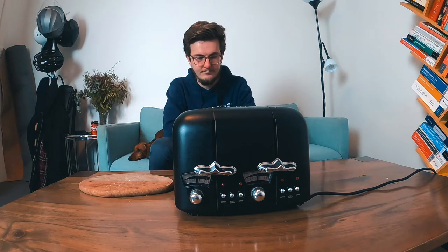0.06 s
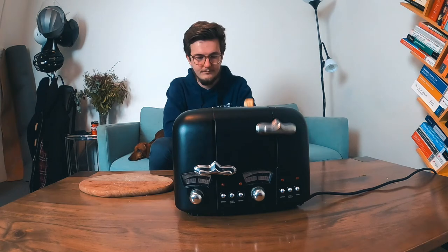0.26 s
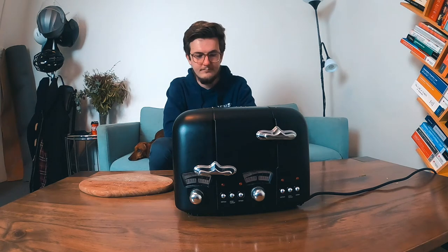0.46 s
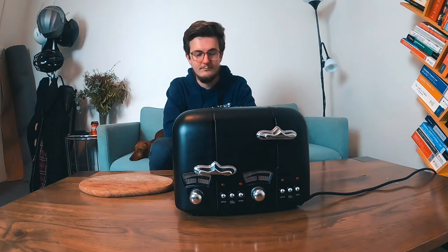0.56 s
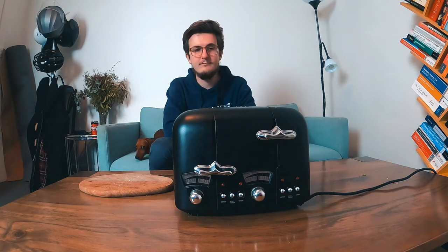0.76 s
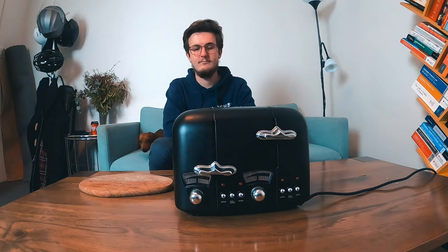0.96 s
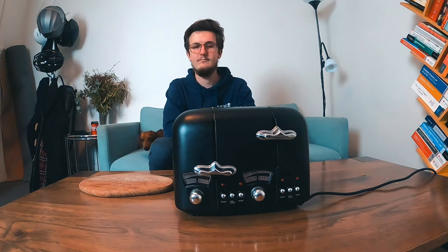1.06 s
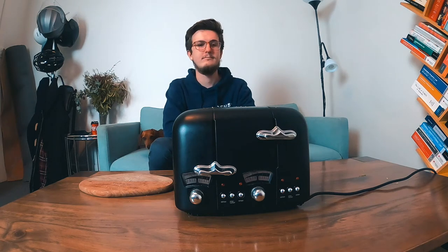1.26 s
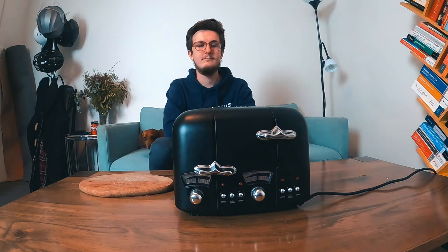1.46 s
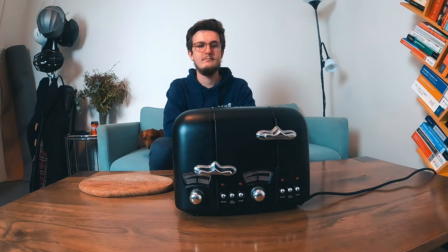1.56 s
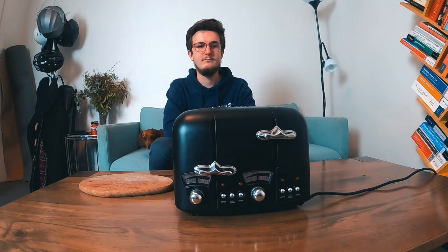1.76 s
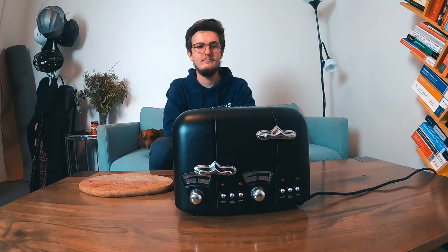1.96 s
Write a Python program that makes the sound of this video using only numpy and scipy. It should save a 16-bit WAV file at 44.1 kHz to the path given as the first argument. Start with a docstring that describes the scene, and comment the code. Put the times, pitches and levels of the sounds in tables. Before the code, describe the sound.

A toaster pops up on a wooden table: the latch snaps, the carriage crashes into its stop and the metal rack rattles, then a faint low buzz fades. The microphone is close, in a quiet room.

```python
"""A snap, a rattling crash and a faint low buzz: a toaster pops up on a wooden table in a quiet room.
The latch lets go and the carriage slams into its stop; the wire rack bounces and rings, loose parts
clatter in the casing and the feet thump the table. The sprung carriage then shudders to rest.
The microphone is close and overloads."""
import sys
import numpy as np
from scipy import signal
from scipy.fft import rfft, irfft
from scipy.io import wavfile
from scipy.ndimage import uniform_filter1d

SR = 44100
rng = np.random.default_rng(int(sys.argv[2]) if len(sys.argv) > 2 else 0)


def dump(signal):
    """Clip the signal to [-1, 1] and save it as 16-bit WAV at the path in sys.argv[1]."""
    limited = np.clip(np.atleast_2d(signal).T, -1, 1)
    pcm = np.round(limited * 32767).astype(np.int16)
    wavfile.write(sys.argv[1], SR, pcm)


N = 88200
T = np.arange(N) / SR

# direct sound, left-right likeness: f/Hz, correlation (clipped to +-1 in use)
DIRECT_CORRELATION = [(100, 1), (700, 0.97), (1500, .85), (3500, 1), (6000, -2.3), (9000, -.5)]


def from_db(db):
    """Decibels to gain."""
    return 10 ** (np.asarray(db) / 20)


def unit_rms(x):
    """Scale to rms 1."""
    return x / np.sqrt(np.mean(x ** 2) + 1e-20)


def at_hz(points, hz):
    """Interpolate a table over log frequency."""
    freqs, values = np.transpose(points)
    return np.interp(np.log(hz), np.log(freqs), values)


def noise(spectrum, correlation):
    """Stereo noise of given spectral shape and left-right correlation; rms 1."""
    hz = np.fft.rfftfreq(N, 1 / SR) + 1
    alike = np.clip(at_hz(correlation, hz), -1, 1)
    mid, side = rfft(rng.standard_normal((2, N))) * from_db(at_hz(spectrum, hz)) * (hz > 20)
    return unit_rms(irfft(np.sqrt(1 + alike) * mid + np.sqrt(1 - alike) * side * [[1], [-1]], N))


def convolve(x, response):
    """Pass a signal through a stereo response scaled to unit energy."""
    return signal.fftconvolve(np.atleast_2d(x), unit_rms(response) / np.sqrt(N), axes=1)[:, :N]


def impulses(hits, scatter_db=0, random_sign=False):
    """One impulse per (t/s, level/dB) row."""
    times_s, db = np.transpose(hits)
    scatter, polarity = rng.standard_normal((len(times_s), 2)).T
    sign = np.sign(polarity) if random_sign else 1
    out = np.zeros(N)
    out[np.clip((times_s * SR).astype(int), 0, N - 1)] = sign * from_db(db + scatter_db * scatter)
    return out


def ring(force, modes):
    """Sum of damped resonators, one per (f/Hz, level/dB, T60/s) row."""
    out = np.zeros(N)
    for hz, db, t60_s in modes:
        r, w = from_db(-60 / (t60_s * SR)), 2 * np.pi * hz / SR
        out += from_db(db) * signal.lfilter([0, np.sin(w)], [1, -2 * r * np.cos(w), r * r], force + 1e-18)
    return out


def contacts(hits, spectrum, t60_s):
    """Each contact lands on a new spot and sets off its own decaying noise burst."""
    energy_decay = from_db(-60 / (t60_s * SR)) ** 2
    energy = signal.lfilter([1], [1, -energy_decay], impulses(hits) ** 2 + 1e-18)
    return np.sqrt(energy) * noise(spectrum, DIRECT_CORRELATION)


def hush():
    """Steady room tone, mostly low."""
    spectrum = [(25, -8.5), (55, -4), (90, -5.5), (160, -2), (240, -5), (400, -7), (600, -13), (900, -15),
                (1300, -13.5), (2600, -21), (7400, -26), (9000, -35.5), (15400, -44.5)]  # f/Hz, density/dB
    correlation = [(60, 1), (180, 0), (550, 0.00012), (1650, 0), (5000, 0.18)]  # f/Hz, left-right correlation
    level_db, pan_db = -55.5, np.array([[-0.2], [0.2]])
    return from_db(level_db + pan_db) * noise(spectrum, correlation)


def latch():
    """The catch snaps open in four quick contacts."""
    snaps = [(.2133, -11.5), (.2158, 0), (.2183, -10.5), (.2203, -3)]  # t/s, level/dB
    spectrum = [(180, -62), (300, -25.5), (1440, -28), (1970, -4.5), (2240, -6.5), (3390, -3.5),
                (4200, -8.5), (5740, -7.5), (7730, -30), (15400, -45.5)]  # f/Hz, density/dB
    return from_db(-5.5) * contacts(snaps, spectrum, t60_s=0.035)


def lever():
    """The lever jolts the shell with dull knocks."""
    jolts = [(.2185, -25.5), (.2305, -19), (.238, -18), (.458, -22.5), (.553, -20)]  # t/s, level/dB
    spectrum = [(100, -6.5), (170, -7), (400, 4), (560, -14.5), (780, -2), (1150, 4), (1600, -17.5),
                (4000, -33)]  # f/Hz, density/dB
    return contacts(jolts, spectrum, t60_s=0.11)


def rack():
    """The wire rack knocks against its guides; each knock clinks and rings the wires."""
    knocks = [(.231, -9), (.2385, -12), (.248, -9), (.2575, -7), (.263, 1), (.2665, 0), (.2705, -5),
              (.275, -4), (.283, -3), (.295, 1), (.2995, -1), (.305, -3), (.312, 0), (.417, -10),
              (.4203, 2), (.4255, 3), (.440, -11), (.448, 1), (.4525, -2), (.461, -8), (.4795, 2),
              (.497, -13), (.5271, -8), (.535, -13), (.5525, -3), (.5585, -4), (.5625, -8), (.570, -4),
              (.600, -19), (.623, -19)]  # t/s, level/dB
    wire_modes = [(3226, -3.5, .04), (3251, 4, 0.085), (3311, -6, .04), (3500, -9, .04), (3490, -7, 0.056),
                  (3596, -7.5, 0.015), (3626, -6.5, .05), (3729, -5.5, .075), (3838, -7.5, 0.06),
                  (3895, -7, 0.049), (4002, -4, .06), (4118, -6.5, 0.038), (4147, -5, .06),
                  (4350, -3.5, 0.078)]  # f/Hz, level/dB, T60/s
    clink_spectrum = [(500, -32.5), (2500, -27), (2900, -20.5), (3250, 7), (4200, 4), (4800, -13),
                      (8000, -22), (15000, -43.5)]  # f/Hz, density/dB
    wires = np.zeros((2, N))
    for hz, db, t60_s in wire_modes:
        force = impulses(knocks, scatter_db=1.0, random_sign=True)
        wire = ring(force, [(hz, db, t60_s)])
        lag_s = rng.normal(0, 0.6) / (2 * np.pi * hz)  # own left-right phase per mode
        wires += [np.interp(T - lag_s, T, wire), np.interp(T + lag_s, T, wire)]
    return from_db(-9) * wires + from_db(-3.5) * contacts(knocks, clink_spectrum, t60_s=0.036)


def casing(taps_per_s=1500, spread_db=3.5, spots=4, shell_t60_s=0.028):
    """Loose parts tap the sheet-metal shell at several spots and ring its panels."""
    rattle = [(.214, -72), (.232, -20.5), (.265, -16), (.285, -16.5), (.3, -10.5), (.32, -5), (.355, -7),
              (.405, -16.5), (.44, -16.5), (.485, -23), (.54, -26), (.556, -22), (.585, -24), (.625, -28.5),
              (.64, -26), (.68, -28), (.712, -30), (.75, -36), (.79, -43.5), (.86, -56)]  # force envelope: t/s, level/dB
    shell_spectrum = [(100, 1.5), (250, -0.5), (400, 3.5), (560, -13.5), (750, -5), (1000, -0.5),
                      (1300, -1), (1700, -2.5), (2400, -5), (3800, 8), (5500, -0.5), (8000, -10),
                      (11000, -20.5), (15000, -30)]  # dense, short-lived modes: f/Hz, density/dB
    panel_modes = [(232, -2, 0.17), (293.3, -4.5, 0.18), (381.4, -6.5, 0.49), (475.3, -10, .2),
                   (712, -4.5, .3), (723, -4.5, .22), (940.6, -5.5, .18), (1039, -7, .18),
                   (1134, -9.5, .22), (1336, -9, 0.33), (1696, 0.5, .1), (2213, -2, 0.15),
                   (2503, 0.5, 0.09), (5302, -4, .13)]  # f/Hz, level/dB, T60/s
    taps = (rng.random(N) < taps_per_s / SR) * rng.choice([-1, 1], N)
    taps = taps * from_db(spread_db * rng.uniform(-1, 1, N))
    force = unit_rms(taps) * from_db(np.interp(T, *np.transpose(rattle), left=-120, right=-120))
    struck_spot = rng.integers(0, spots, N)
    shell = np.zeros((2, N))
    for spot in range(spots):
        response = noise(shell_spectrum, DIRECT_CORRELATION) * from_db(-60 * T / shell_t60_s)
        shell += convolve(force * (struck_spot == spot), response)
    return from_db(4) * shell + from_db(-37.5) * ring(force, panel_modes)


def table(cutoff_hz=250):
    """Soft blows from the feet ring the table top."""
    thumps = [(.232, -17), (.30, -7), (.322, -32), (.334, 1), (.358, -0.5), (.41, -5.5), (.434, -33),
              (.462, -2), (.495, -11.5), (.555, -10.5), (.58, -5), (.603, -14.5), (.635, -9), (.67, -20.5),
              (.708, -15.5), (.795, -24)]  # t/s, level/dB
    top_modes = [(46.3, -1, 0.8), (56, 2.5, 0.32), (68, -4.5, .18), (94, 6, 0.11), (122, -4.5, .16),
                 (156, -22, .14), (169, -4.5, .12)]  # f/Hz, level/dB, T60/s
    soften = signal.butter(2, cutoff_hz, fs=SR, output="sos")
    force = signal.sosfilt(soften, impulses(thumps) + 1e-18)
    return from_db(-18) * ring(force, top_modes)


def slam():
    """The carriage crashes into its stop."""
    impacts = [(.3165, 5.5), (.3205, 3.5), (.333, -1), (.347, -4.5), (.358, -6), (.377, -3.5)]  # t/s, level/dB
    spectrum = [(100, -5), (250, -1), (600, -8), (1000, -4.5), (1400, -7), (1700, 4.5), (2000, 2),
                (2300, 6.5), (3000, -8), (6000, -12), (9000, -16.5), (15000, -27.5)]  # f/Hz, density/dB
    return from_db(-3.5) * contacts(impacts, spectrum, t60_s=0.035)


def twangs(rise_s=0.004):
    """Single panels swell briefly on one note each and die away."""
    notes = [(.497, 733.5, -13, 0.21), (.648, 1138, -19.5, 0.18)]  # t/s, f/Hz, level/dB, T60/s
    out = np.zeros(N)
    for start_s, hz, db, t60_s in notes:
        age_s = np.maximum(T - start_s, 0)
        rise = 1 - np.exp(-(age_s / rise_s) ** 2)
        out += rise * from_db(db - 60 * age_s / t60_s) * np.sin(2 * np.pi * hz * age_s)
    return out


def shudder(swing_hz=63.6, wander=0.017, hum_start_s=0.65, rise_s=0.045, fade_db_per_s=15, scatter_db=4):
    """The carriage's dying swing on its spring hums and taps the casing once a cycle."""
    partials = [(1, 0), (2, -2), (3, -21), (4, -22)]  # hum: harmonic number, level/dB
    buzz_envelope = [(.6, -50), (.72, -40), (.86, -47.5), (.93, -55.5), (1.05, -54.5), (1.14, -52),
                     (1.245, -56.5), (1.275, -62), (1.55, -63), (2.0, -68)]  # t/s, level/dB
    buzz_modes = [(365.4, -1.5, 0.18), (376, -5.5, 0.083), (486, -12.5, 0.063), (670, -10, 0.033),
                  (1090, -11, 0.11), (1190, -13, 0.09), (1340, -8.5, .02), (2000, -19, .01)]  # tapped casing: f/Hz, level/dB, T60/s
    drift = unit_rms(uniform_filter1d(rng.standard_normal(N), size=3000))
    cycles = np.cumsum(swing_hz * (1 + wander * drift)) / SR
    age_s = T - hum_start_s
    hum_gain = np.clip(age_s / rise_s, 0, 1) * from_db(-45 - fade_db_per_s * age_s)
    hum = sum(from_db(db) * np.sin(2 * np.pi * harmonic * cycles) for harmonic, db in partials)
    taps = np.diff(np.floor(cycles), prepend=0) * from_db(scatter_db * rng.standard_normal(N))
    buzz_gain = from_db(np.interp(T, *np.transpose(buzz_envelope), left=-120))
    return hum_gain * unit_rms(hum) + buzz_gain * unit_rms(ring(taps, buzz_modes))


def settling():
    """The parts tick faintly into place."""
    ticks = [(.875, -43.5), (.884, -49)]  # t/s, level/dB
    spectrum = [(500, -11), (2000, -14), (4200, -1.5), (6500, -15), (9500, -14), (12000, -42)]  # f/Hz, density/dB
    return contacts(ticks, spectrum, t60_s=0.3)


def reverb(x, predelay_s=0.0067):
    """Diffuse room tail, longest in the midrange."""
    spectrum = [(50, -4.5), (500, 3), (2000, -2.5), (4000, -15), (8000, 16.5), (15000, -2.5)]  # f/Hz, density/dB
    correlation = [(100, 0.78), (700, .92), (1500, 0.27), (3500, .2), (6000, 0.24), (10000, -.2)]  # f/Hz, left-right correlation
    decay_times = [(100, 0.17), (500, 0.61), (1500, 0.79), (4000, 0.63), (12000, .36)]  # f/Hz, T60/s
    wash = noise(spectrum, correlation)
    edges_hz = np.geomspace(30, 18000, 9)
    tail = np.zeros((2, N))
    for low, high in zip(edges_hz, edges_hz[1:]):
        band = signal.sosfilt(signal.butter(2, [low, high], "band", fs=SR, output="sos"), wash)
        tail += band * from_db(-60 * T / at_hz(decay_times, np.sqrt(low * high)))
    return convolve(x.mean(axis=0), tail * (T > predelay_s))


def limiter(x, threshold_db=4, release_db_per_s=1499, attack_s=0.0003):
    """Fast stereo-linked peak limiter with a constant release rate."""
    over_db = np.maximum(20 * np.log10(np.abs(x).max(axis=0) + 1e-9) - threshold_db, 0)
    held_db = np.maximum.accumulate(over_db + release_db_per_s * T) - release_db_per_s * T
    pole = np.exp(-1 / (attack_s * SR))
    return x * from_db(-signal.lfilter([1 - pole], [1, -pole], held_db))


def scene():
    """The toaster on its table, its reverberation and the room tone."""
    toaster = latch() + settling() + rack() + casing() + slam() + lever() + twangs() + table() + shudder()
    return toaster + from_db(-10.5) * reverb(toaster) + hush()


def record(dry, left_delay_s=0.00005, low_cut_hz=48, high_cut_hz=15700):
    """Overloaded microphone: slight left delay, low cut, limiter, soft clip at +-1, high cut."""
    low_cut = signal.butter(4, low_cut_hz, "high", fs=SR, output="sos")
    high_cut = signal.ellip(10, 0.1, 70, high_cut_hz, fs=SR, output="sos")
    arriving = np.array([np.interp(T - left_delay_s, T, dry[0]), dry[1]])
    limited = limiter(signal.sosfilt(low_cut, arriving))
    clipped = limited / (1 + limited ** 12) ** (1 / 12)
    return signal.sosfilt(high_cut, clipped)


dry = scene()
out = record(dry)
dump(out)
```